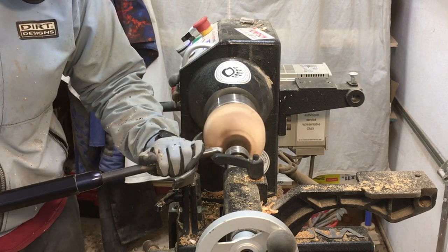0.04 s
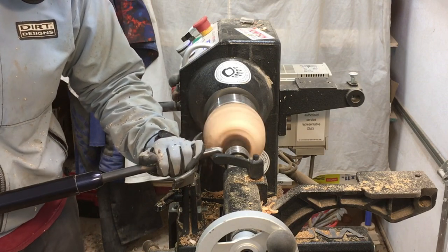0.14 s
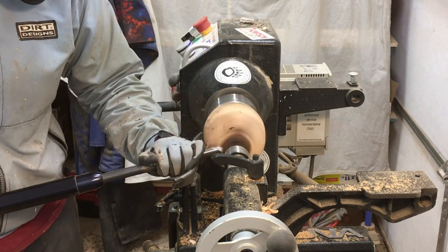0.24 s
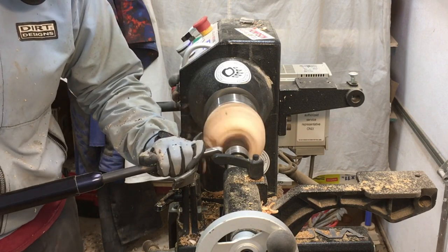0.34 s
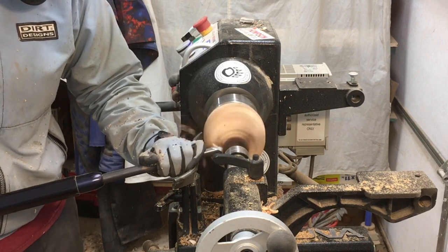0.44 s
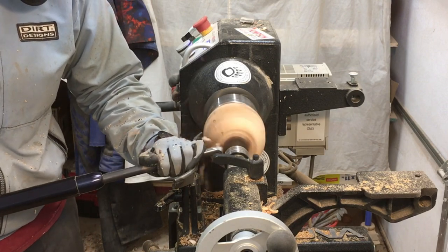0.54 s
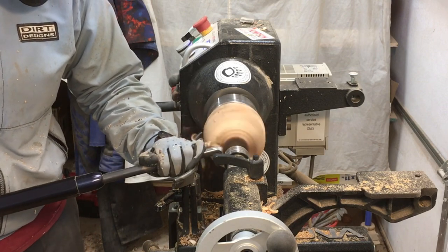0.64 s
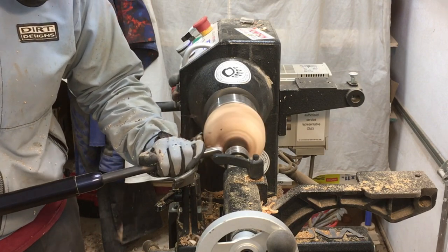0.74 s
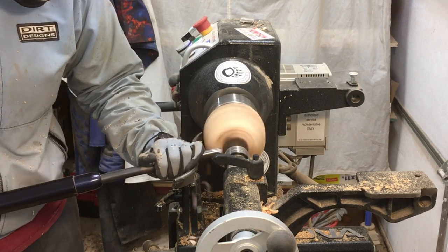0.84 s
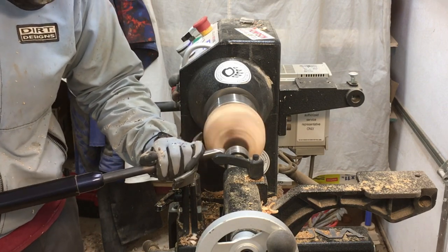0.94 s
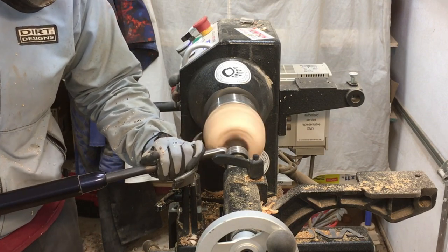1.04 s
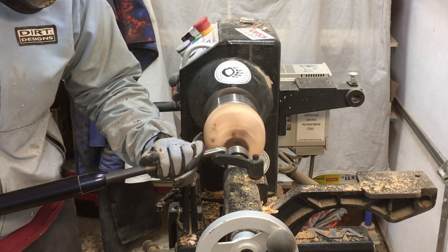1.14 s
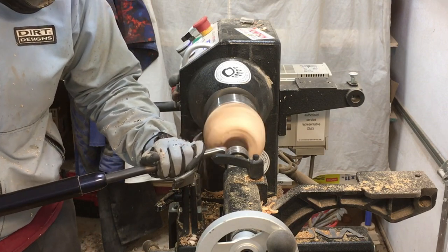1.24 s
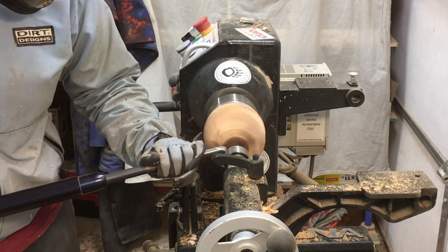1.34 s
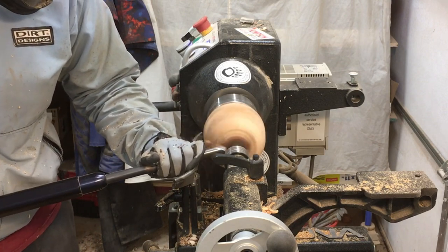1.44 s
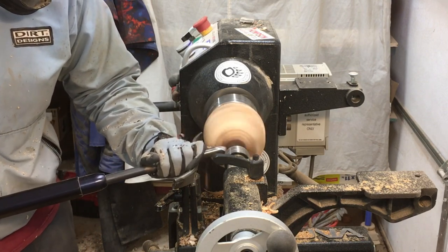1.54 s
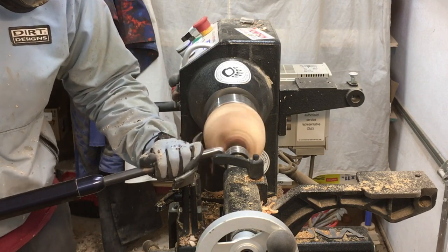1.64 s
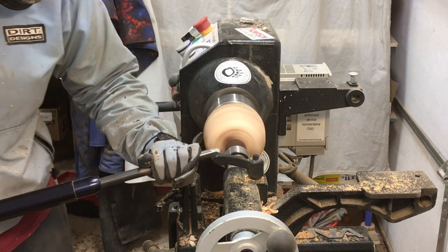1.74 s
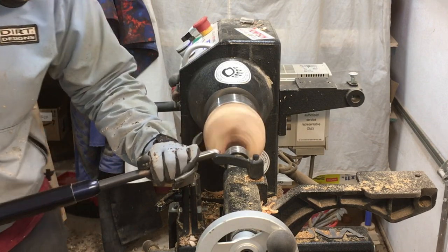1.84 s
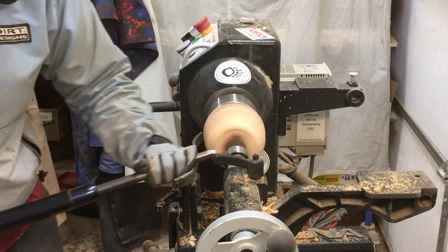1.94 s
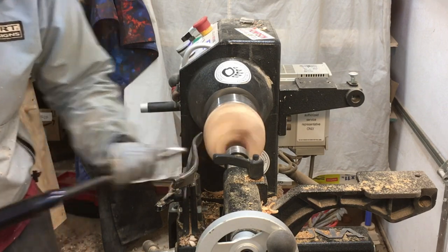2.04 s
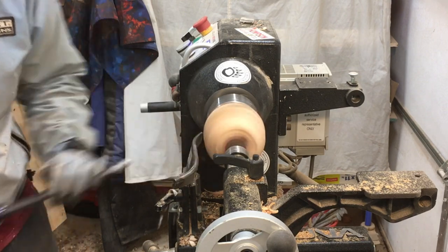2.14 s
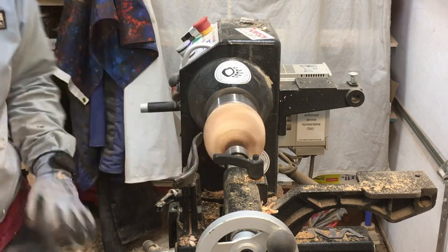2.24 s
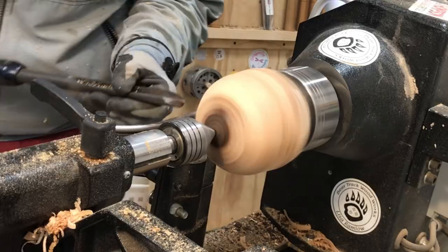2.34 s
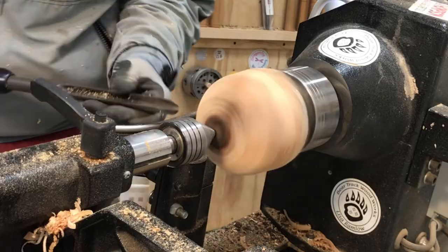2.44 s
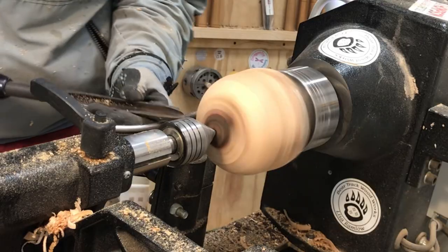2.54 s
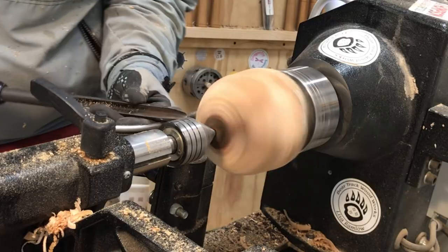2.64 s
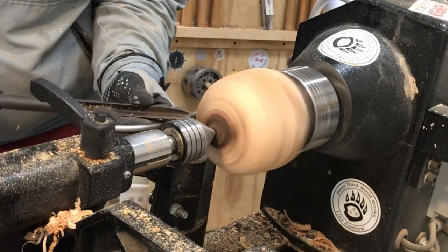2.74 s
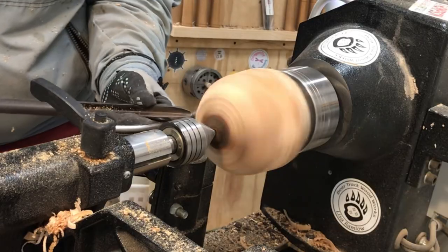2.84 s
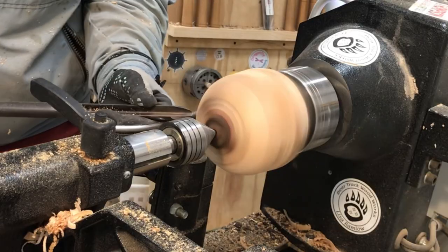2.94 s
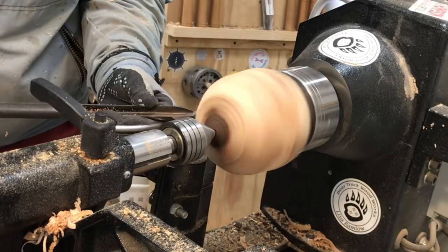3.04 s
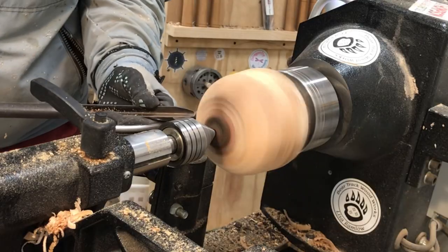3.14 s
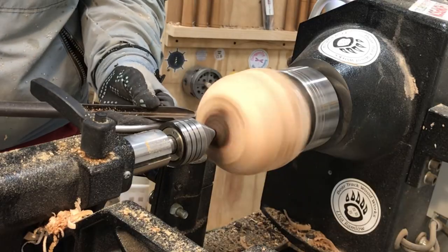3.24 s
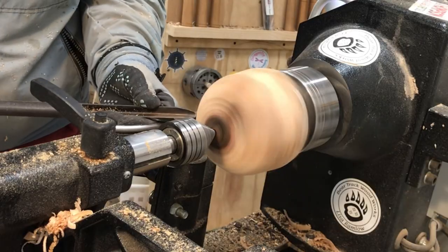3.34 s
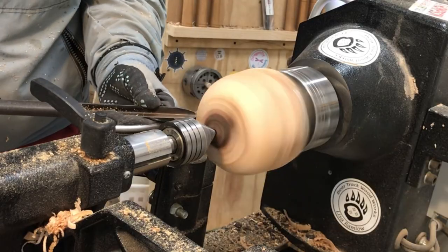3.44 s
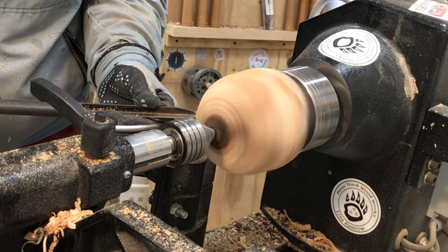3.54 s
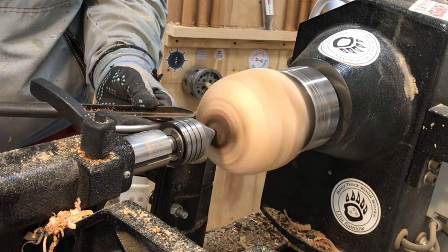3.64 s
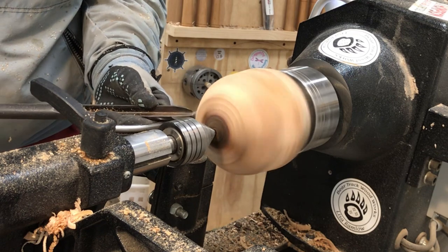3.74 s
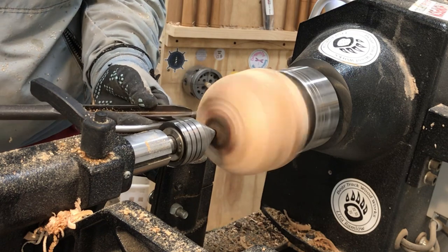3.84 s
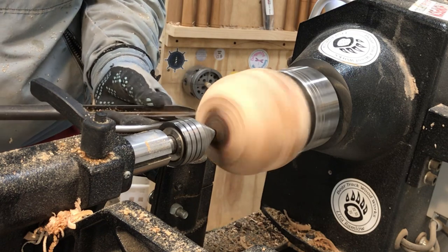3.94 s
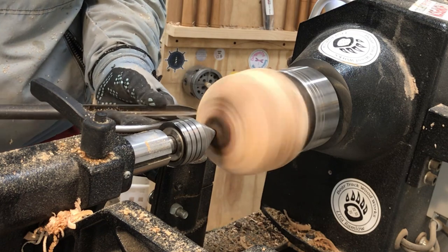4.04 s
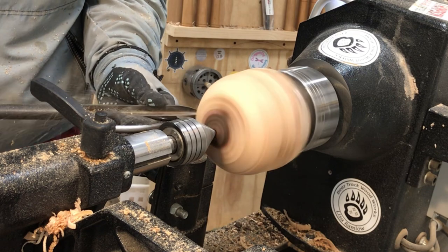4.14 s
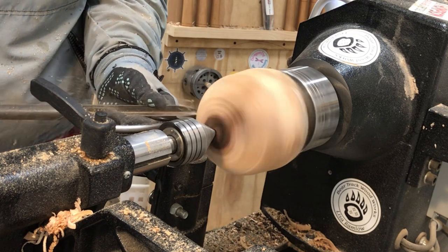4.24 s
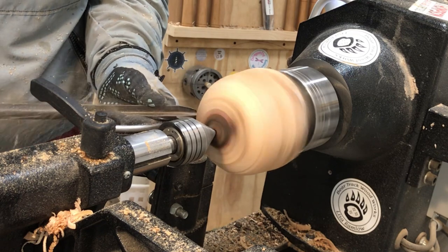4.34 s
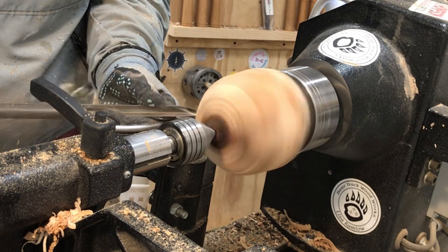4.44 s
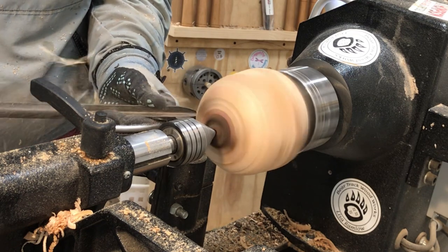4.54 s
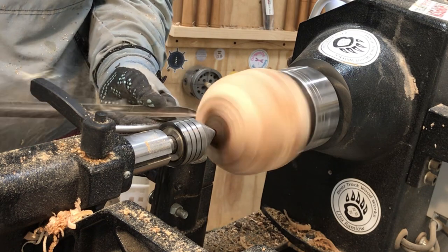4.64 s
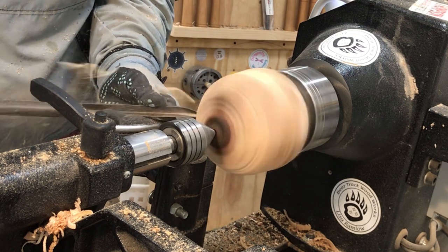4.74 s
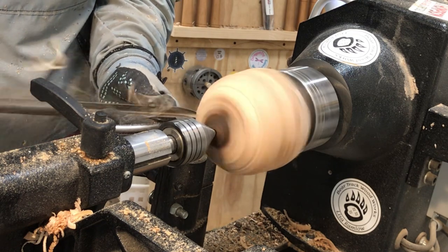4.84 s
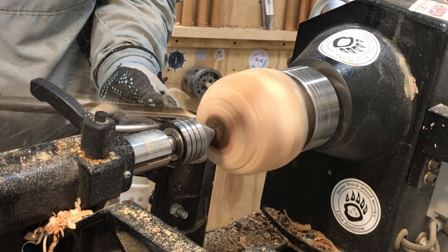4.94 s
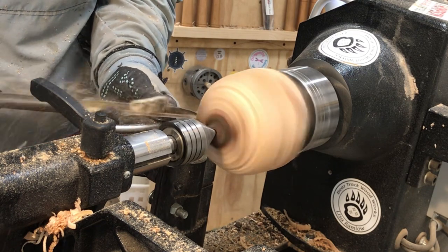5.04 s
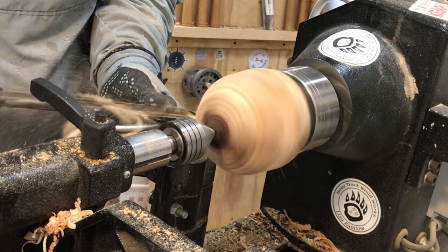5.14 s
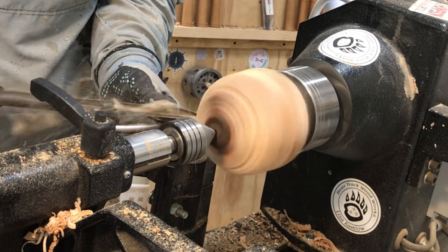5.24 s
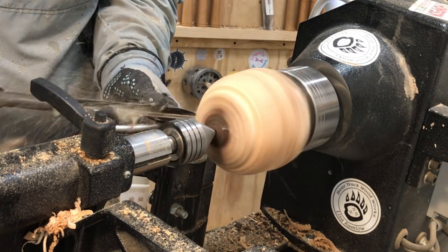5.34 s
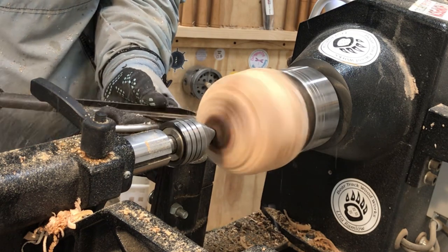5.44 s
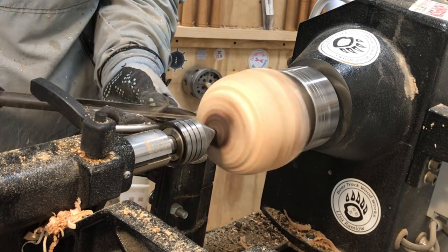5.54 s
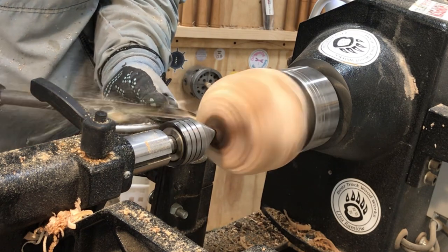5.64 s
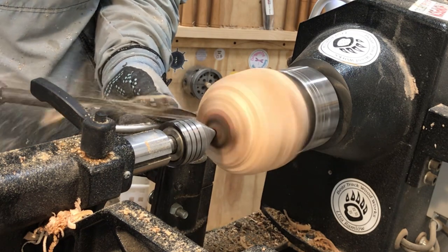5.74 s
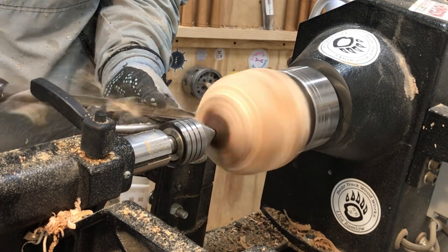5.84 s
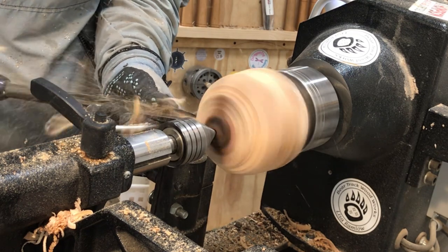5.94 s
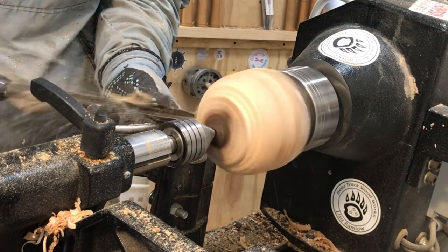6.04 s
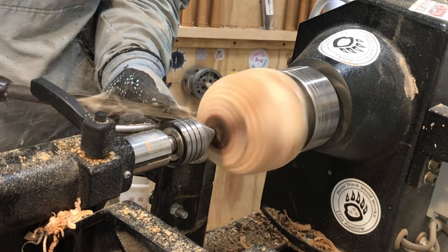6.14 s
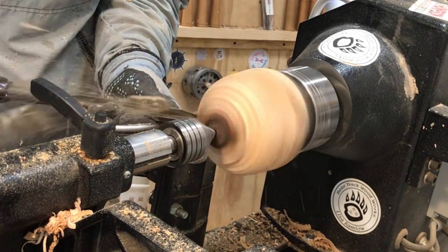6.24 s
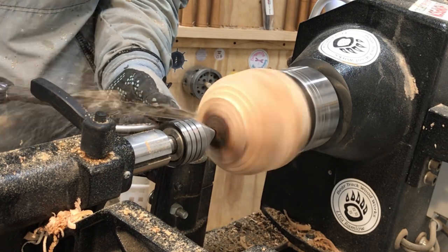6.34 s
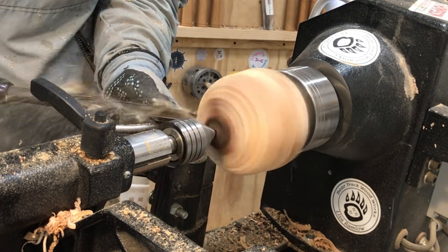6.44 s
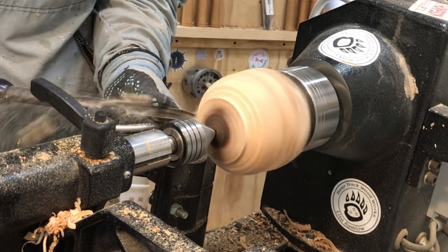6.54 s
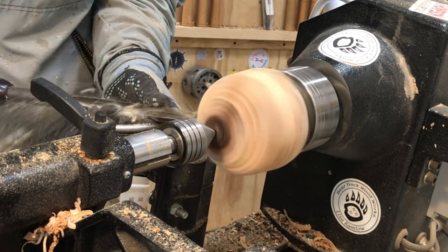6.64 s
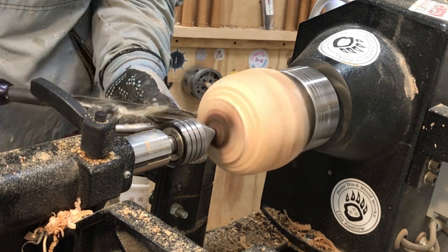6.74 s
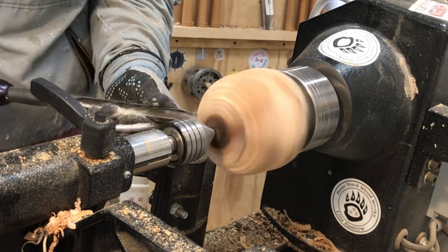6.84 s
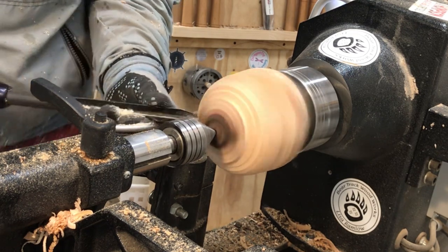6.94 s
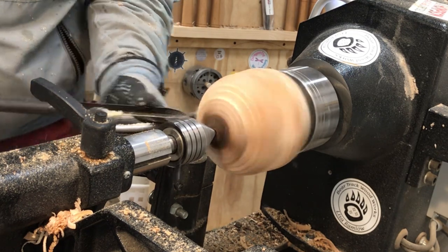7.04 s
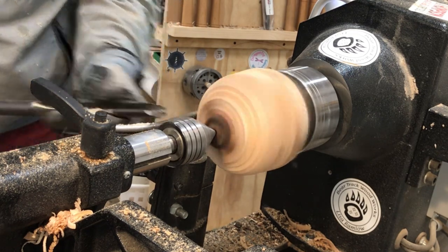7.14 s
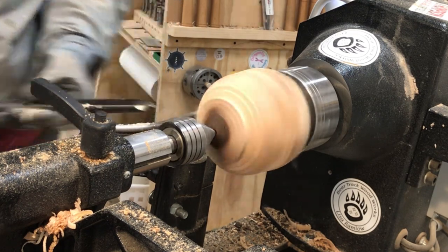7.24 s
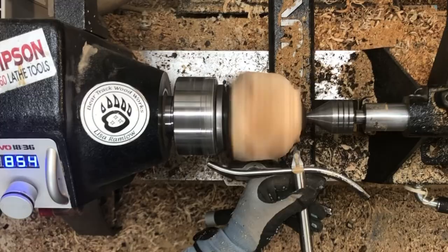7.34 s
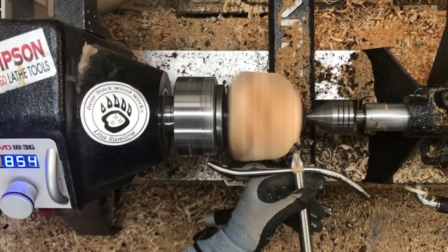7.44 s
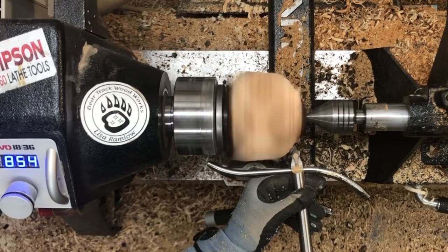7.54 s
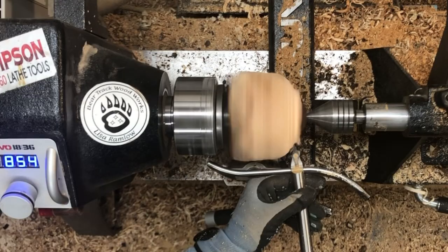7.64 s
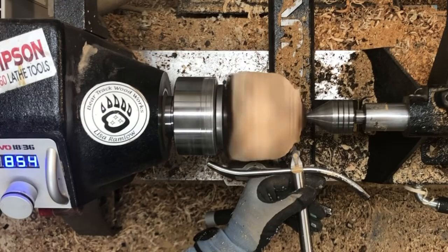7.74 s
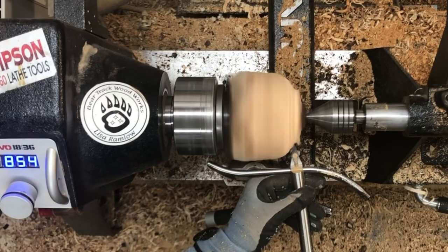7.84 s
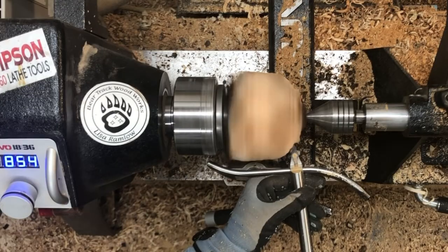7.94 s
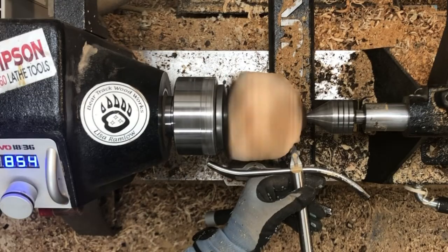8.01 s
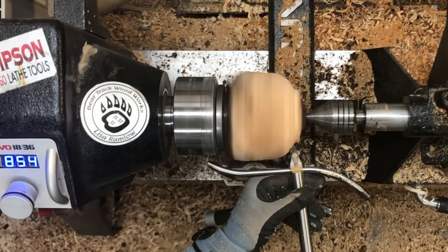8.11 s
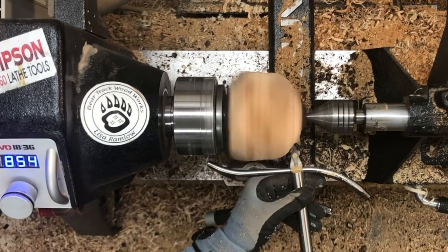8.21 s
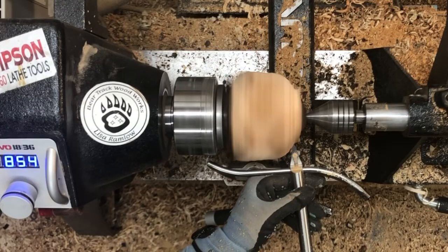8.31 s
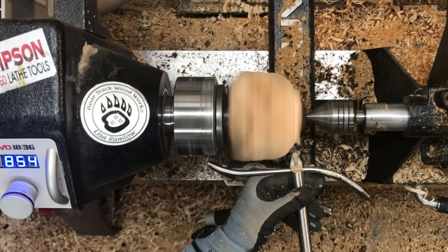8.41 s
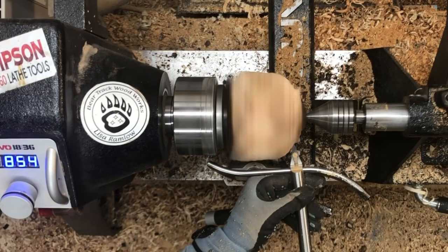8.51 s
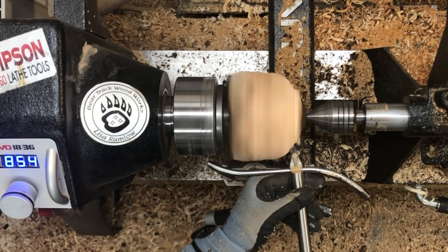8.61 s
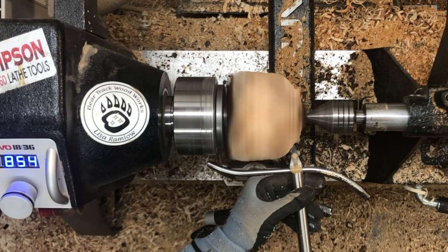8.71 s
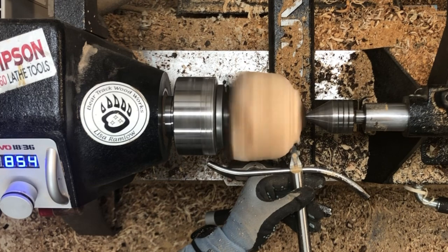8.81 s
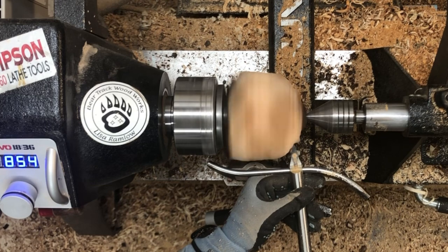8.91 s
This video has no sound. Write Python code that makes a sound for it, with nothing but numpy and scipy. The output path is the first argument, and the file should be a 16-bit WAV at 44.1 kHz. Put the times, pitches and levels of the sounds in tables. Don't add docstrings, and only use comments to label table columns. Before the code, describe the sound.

Raspy wood-turning cuts come and go over thin high motor whine, with knocks on a ringing steel rest, ending in rapid soft taps.

```python
import sys
import numpy as np
from scipy import signal
from scipy.fft import rfft, irfft, next_fast_len
from scipy.io import wavfile
from scipy.ndimage import uniform_filter1d

SR = 44100
rng = np.random.default_rng(int(sys.argv[2]) if len(sys.argv) > 2 else 0)


def file_out(sig):
    cols = np.atleast_2d(sig).T
    lim = np.clip(cols, -1, 1)
    pcm = np.round(lim * 32767).astype(np.int16)
    wavfile.write(sys.argv[1], SR, pcm)


def magnitude_from_level(level_db):
    exponent = np.asarray(level_db, float) / 20
    return 10 ** exponent


N = 395577
TURNS_PER_S = 14.3
BED, STAND = (312, 9.4), (146, 15.5)


def rms_one(x):
    return x / np.sqrt(np.mean(x ** 2) + 1e-20)


def in_time(rows, outside=None):
    s, *columns = np.transpose(rows)
    return np.array([np.interp(np.arange(N) / SR, s, c, outside, outside) for c in columns])


def strokes(spans):
    t = np.arange(N) / SR
    touching = sum((t >= rows[0][0]) & (t < rows[-1][0]) for rows in spans)
    return *in_time(sum(spans, [])), touching


def gains(spans):
    return sum(magnitude_from_level(in_time(rows, outside=-200)) for rows in spans)


def coloured(x, spectrum):
    size = next_fast_len(len(x))
    hz = np.fft.rfftfreq(size, 1 / SR) + 1
    at, db = np.transpose(spectrum)
    gain = magnitude_from_level(np.interp(np.log(hz), np.log(at), db))
    return rms_one(irfft(rfft(x, size) * gain, size)[:len(x)])


def drift(hz):
    low = signal.butter(2, hz, fs=SR, output="sos")
    return rms_one(signal.sosfilt(low, rng.standard_normal(N + SR))[SR:])


def resonate(x, modes, waver_db=0, waver_hz=15):
    out, wander = 0, magnitude_from_level(1.5 * waver_db * np.tanh(drift(waver_hz) / 1.3))
    for k, (hz, width, db) in enumerate(modes):
        r = np.exp(-np.pi * width / SR)
        top = magnitude_from_level(db) * (-1) ** k * (1 - r * r) / 2
        drive = x * np.roll(wander, k * N // 17)[:len(x)] + 1e-18
        out = out + signal.lfilter([top, 0, -top], [1, -2 * r * np.cos(2 * np.pi * hz / SR), r * r], drive)
    return out


def smoothed(x, fall_s, gain=1):
    r = np.exp(-1 / (SR * fall_s))
    return signal.lfilter([gain * (1 - r)], [1, -r], x)


def fibres(per_s, spread_db):
    sizes = magnitude_from_level(spread_db * np.minimum(rng.exponential(1, N), 5)) * rng.standard_normal(N)
    return rms_one(sizes * (rng.random(N) < per_s / SR))


def contacts(rows, shake):
    out, t = np.zeros(N + SR), np.arange(2000) / SR
    for s, db, shake_db, ms in rows:
        x = t / (ms / 2000)
        out[round(s * SR):][:len(t)] += magnitude_from_level(db + shake * shake_db) * x ** 2 * np.exp(2 - 2 * x)
    return out[:N]


# [t/s, shaving hiss/dB, push/dB, bed share of push/dB]
EARLY_CUTS = [
    [(0.0, -38, -13.5, -3.5), (0.14, -31, -12, -2), (0.3, -27.5, -7.5, -7.5), (0.5, -29.5, -12, -4),
     (0.62, -27.5, -21.5, -4), (0.76, -37, -21, -0.5), (0.86, -67, -50, -6)],
    [(0.97, -61, -39.5, 3), (1.08, -55, -14.5, -7.5), (1.16, -27.5, -8, 1.5), (1.23, -33.5, -13, 0),
     (1.31, -29, -6.5, -10), (1.39, -30.5, -8, -2), (1.5, -32.5, -7.5, -12), (1.6, -49, -33, -11),
     (1.7, -86, -45, -6)],
]
# [t/s, peak/dB, rest shake re peak/dB, length/ms]
BITES = [(0.0064, -23.5, -20, 4.4), (0.043, -22, -6, 4.4), (0.0734, -28, -19, 6.6), (0.1125, -19, 14, 4.7),
         (0.1414, -31, -12, 11), (0.2096, -29, 20, 7), (0.3494, -31, 20, 19), (0.404, -22, 8, 2.8),
         (0.4849, -32, 7, 3.7), (0.613, -33, 19, 7.1), (0.7528, -24, -17, 3.4), (0.9798, -42, -27, 8.4),
         (1.0144, -45, -7, 4), (1.046, -25.5, 12, 9.7), (1.0849, -34, -5, 3.8), (1.1179, -21.5, 23.5, 7.9),
         (1.1539, -12, 6, 6.7), (1.1877, -34, -1, 4.4), (1.254, -23.5, 1, 9.6), (1.394, -31, 25, 18),
         (1.489, -37, 7, 5.1), (3.489, -36.5, -16, 11), (3.5584, -29, -20, 3.6), (5.378, -23.5, -16, 12),
         (5.415, -35, -18, 8), (5.4482, -25, -35, 7.9), (5.4855, -29, -16, 4.1), (5.5165, -15, -30, 3.3),
         (6.9284, -34.5, -28, 9.4), (6.9984, -23.5, -37, 5)]


def gouge():
    angle, skims = spindle(), grazes()
    bites, hiss, deep_push = long_cut(angle)
    shave_db, push_db, bed_share_db, shaving = strokes(EARLY_CUTS)
    near = shaving * magnitude_from_level(shave_db + 2.0 * drift(58))
    touch = magnitude_from_level(2.5) * contacts(BITES, shake=0)
    graze = magnitude_from_level(-7.0) * contacts(skims, shake=0)
    early = np.arange(N) < 2.31 * SR
    tear = torn_fibres(bites, hiss, near, touch, early)

    whole = bites + hiss + near + touch + graze + 0.0054
    follow = whole / uniform_filter1d(whole, size=3084)
    jolts = smoothed(magnitude_from_level(-12.5) * touch * ~early + magnitude_from_level(-12.5) * graze + 1e-18, 0.032, gain=10)
    all_push = deep_push + shaving * magnitude_from_level(push_db) + jolts
    thrum, ringing, boom = shaking(all_push, bed_share_db, early)
    push = fibres(per_s=9000, spread_db=3.0)
    rest = tool_rest(ringing, follow, skims, push, angle)
    bed = bed_and_stand(thrum, boom, follow, push, angle)
    return tear + grazed_wood(graze, push) + rest, bed + thuds(skims)


# [t/s, lead/turns]
LEAD = [(4.02, -0.405), (4.6, -0.407), (5.0, -0.398), (5.38, -0.508), (5.75, -0.47), (6.4, -0.645),
        (6.64, -0.68), (7.02, -0.672)]


def spindle():
    return TURNS_PER_S * np.arange(N) / SR + in_time(LEAD)[0]


# [t/s, hiss/dB, end-grain bite/dB, first bite re second/dB]
DEEP_CUTS = [
    [(4.0, -38.5, -29.5, -1), (4.14, -36, -22, -5.5), (4.6, -32, -19, 4.5), (5.0, -22.5, -14.5, -2.5),
     (5.27, -23, -15.5, -1.5), (5.365, -30.5, -22.5, -14)],
    [(5.535, -31, -22.5, -2), (5.77, -22.5, -12.5, -1.5), (6.08, -18, -14, 21), (6.35, -21, -15, -7),
     (6.58, -31.5, -19, -12.5), (6.74, -31.5, -20, -15.5), (6.89, -37, -32, -30), (6.915, -44, -30, -33.5),
     (7.05, -49, -75, -13)],
]
# [t/s, crest/dB, bite re usual/dB]
CRESTS_A = [(4.0119, -38, 8), (4.049, -26.0, -8), (4.0836, -27, 0.7), (4.119, -23.5, -7), (4.1537, -24, -2),
            (4.1879, -29, -4), (4.2229, -25, 0), (4.2568, -26, 1.5), (4.2927, -30, 1), (4.3254, -20, -3),
            (4.365, -21.0, -4), (4.396, -24, -2), (4.4325, -22, -1), (4.4636, -14, -3.5),
            (4.5018, -27.0, -2), (4.5353, -25, 4), (4.5731, -23, -3), (4.6047, -17, -4), (4.6435, -28, -2),
            (4.6748, -22.5, 0.5), (4.7131, -14, -6), (4.745, -20, 3.5), (4.784, -18, -4),
            (4.8157, -15, -0.4), (4.853, -15.5, 1.5), (4.888, -17, -6), (4.9267, -18, 1.5), (4.956, -9, -1),
            (4.9955, -18.0, 4), (5.0275, -17, -1), (5.066, -15, 5), (5.0993, -18.0, 4), (5.1386, -11, -1),
            (5.1697, -18.0, 4), (5.2098, -10, 3.5), (5.241, -25, 4), (5.2817, -15, 2.5), (5.313, -14, 0.1),
            (5.3487, -31, -2)]
CRESTS_B = [(5.558, -26, 1), (5.5917, -25, 7), (5.6273, -25, 1), (5.6605, -26.0, 2.5), (5.6994, -17, -5),
            (5.7251, -20, 1), (5.769, -14, -6), (5.801, -29.0, 2), (5.8415, -17, -4), (5.8671, -23.0, 7.5),
            (5.9108, -14, -9), (5.9434, -25, 11), (5.9781, -5.5, -9), (6.0097, -9, 1), (6.0486, -22, -2.5),
            (6.081, -10, -9), (6.12, -19, -1.5), (6.162, -9, 4), (6.1973, -15.0, -1), (6.232, -9.5, 0),
            (6.2683, -15, 1), (6.3034, -28, 1.5), (6.3377, -13, -4), (6.3735, -12, -2), (6.4104, -23, -7),
            (6.4434, -14, -0.5), (6.4798, -24.0, 2.1), (6.514, -15, -1), (6.5491, -20, 1.7),
            (6.5814, -16, -0.9), (6.6192, -27, 0), (6.654, -17, -1), (6.6885, -25.5, -11),
            (6.723, -19, -0.3), (6.7596, -35, 2), (6.793, -28, 2), (6.829, -32.0, 8), (6.8633, -18, 2.2),
            (6.8938, -45, 6)]


def long_cut(angle):
    hiss_db, bite_db, lopsided_db, touching = strokes(DEEP_CUTS)
    bites = 0
    for db, at_turns in ((bite_db + lopsided_db / 2, 0), (bite_db - lopsided_db / 2, 0.488)):
        width = np.clip(.225 + 0.0065 * bite_db, .065, .16)
        off = (angle - at_turns + .5) % 1 - .5
        sharp = np.maximum(0.45 * width, 2 * width - .13)
        width = np.where((off < 0) & (at_turns > 0), sharp, width)
        bites = bites + magnitude_from_level(db + .4 * drift(25)) * np.exp(-(off / width) ** 2)
    s, crest_db, over_db = np.transpose(CRESTS_A + CRESTS_B)
    crest_lead_s, crest_ms = .001, 5
    crests = contacts(zip(s - crest_lead_s, crest_db + 3.5, 0 * s, crest_ms + 0 * s), shake=0)
    bites = np.hypot(bites * magnitude_from_level(-2 + in_time(list(zip(s, over_db)))[0]), crests)
    push = magnitude_from_level(bite_db + 0.32 * np.abs(lopsided_db))
    return bites * touching, magnitude_from_level(hiss_db) * touching, push * touching


# [f/Hz, width/Hz, level/dB]
GOUGE = [(4700, 140, -1), (4900, 300, 0), (5290, 140, -5), (7150, 150, -4), (7680, 90, -6), (8470, 80, -1),
         (9140, 150, -3), (11100, 300, -7)]
# [f/Hz, width/Hz, level/dB]
CHATTER = [(4240, 105, 0)]
# [f/Hz, level/dB per Hz]
TEAR_NEAR = [(1530, -2.5), (2600, 1.5), (3110, -6), (3360, -7), (3860, -8), (4570, 0), (6180, -5.5),
             (7100, -5.5), (15200, -8.5), (16100, -17), (16500, -55)]
TEAR_FAR = [(1710, -14.5), (3000, -13), (4760, -7), (5920, -10.5), (9220, -13.5), (12000, -7.5),
            (15700, -19.5), (16200, -47)]
BITE_FAR = [(1710, -1), (3000, 0), (4300, 4), (5900, 5), (7000, 13), (15500, 14), (16100, -28),
            (16500, -87)]
COARSE = [(700, -27), (1600, 0.5), (3400, 6), (5000, -0.5), (8000, -28)]


def torn_fibres(bites, hiss, near, touch, early):
    snaps = fibres(per_s=24000, spread_db=1.6)
    chips = patchy(snaps, patch_db=3.0)
    flute = resonate(snaps, GOUGE, waver_db=4.5, waver_hz=22)
    lumps = fibres(per_s=900, spread_db=4.5)
    steel = coloured(chips + magnitude_from_level(1.5) * flute, TEAR_FAR)
    end_grain = coloured(chips + magnitude_from_level(3) * flute, BITE_FAR)
    early_tear = (near + touch) * coloured(snaps + 0.84 * chips + 0.7 * lumps, TEAR_NEAR)
    tear = np.where(early, early_tear, hiss * steel + (bites + touch) * end_grain)
    tear = tear + magnitude_from_level(16) * resonate(bites ** 2 * snaps, CHATTER, waver_db=6.5)
    return tear + magnitude_from_level(-12.5) * (hiss + near + .4 * bites) * coloured(np.roll(lumps, SR), COARSE)


def patchy(x, patch_db):
    out, below, wander = 0, 0, magnitude_from_level(patch_db * drift(40.0))
    for k, hz in enumerate(np.geomspace(2500, 20000, 8)):
        low = signal.filtfilt(*signal.butter(2, hz, fs=SR), x)
        out = out + np.roll(wander, k * N // 17) * (low - below)
        below = low
    return rms_one(out)


def grazes():
    from_s, every_s, count = 7.9349, .06933, 15
    k = np.arange(-1, count)
    db = -25.5 - np.where(k < 0, 2, 0.46 * k) + 1.0 * rng.standard_normal(len(k))
    shake_db, length_ms = -17 - .8 * k, 6.1 + 0 * k
    return list(zip(from_s + every_s * k, db, shake_db, length_ms))


# [f/Hz, width/Hz, level/dB]
BLANK = [(1050, 640, -1), (2470, 260, 4), (3750, 500, 3)]
# [f/Hz, level/dB per Hz]
GRAZE_TEAR = [(300, -20), (1500, -13), (4850, -0.5), (6050, 1.5), (14500, -2.5), (16000, -12), (16500, -31)]


def grazed_wood(graze, push):
    wood = magnitude_from_level(-26) * smoothed(graze + 1e-18, 0.0076, gain=10) * rms_one(resonate(push, BLANK))
    snaps = fibres(per_s=24000, spread_db=1.6)
    return wood + graze * coloured(snaps, GRAZE_TEAR)


def shaking(push, bed_share_db, early):
    over_db = 20 * np.log10(push + 1e-6) + 13
    parts = ((-33, 0.93, bed_share_db * early),
             (-29, 0.95, 0),
             (-39, 0.67, (1.6 * bed_share_db + 2) * early))
    return [magnitude_from_level(db + slope * over_db + more + 1.0 * drift(3.8)) for db, slope, more in parts]


# [f/Hz, width/Hz, level/dB]
REST = [(527, 49, -2.5), (605, 5, 3.5), (430, 10, -3), (841, 85, -2.5), (959, 18, -5), (1044, 45, -0.5),
        (1138, 15.5, -1.5), (1468, 29, -5), (1625, 25.5, -0.5), (1852, 44, -2.5), (2206, 11, -2),
        (2427, 58, -1), (213, 15, -12), (3255, 61, -12)]
# [f/Hz, level/dB per Hz]
SHAKE = [(40, -83), (112, -40), (143, -3), (240, -15.5), (290, -5), (450, -13), (1640, -16.5), (2410, -25),
         (3300, -39), (7260, -110)]


def tool_rest(ringing, follow, skims, push, angle):
    lagged = np.roll(follow, round(.005 * SR))
    force = magnitude_from_level(4.0) * ringing * lagged ** 0.66 + magnitude_from_level(-8.0) * contacts(BITES + skims, shake=0.75)
    usual = np.std(resonate(push[:SR], REST))
    ring = magnitude_from_level(-4.5) * resonate(force * push, REST, waver_db=3.5, waver_hz=24) / usual
    grain = rms_one(push[(angle % 1 * SR / TURNS_PER_S).astype(int)] + .5 * push)
    return ring + magnitude_from_level(-7.0) * force * coloured(grain, SHAKE)


# [t/s, steady bed/dB, rocking bed/dB, stand kick/dB, kick lag/turns]
LOCKED = [
    [(4.0, -63, -53, -48, 0.38), (4.15, -37, -43, -62, 0.23), (4.45, -55, -40, -46, 0.44),
     (4.7, -49, -44, -60, 0.27), (4.9, -38, -24.5, -55, 0.62), (5.05, -40, -29.5, -34, 0.58),
     (5.2, -24.5, -27, -29, 0.43), (5.32, -29, -27, -34, 0.42), (5.41, -44, -37, -42, 0.46)],
    [(5.52, -54, -32, -61, 0.41), (5.6, -48, -30, -38, 0.33), (5.8, -74, -23.5, -35, 0.55),
     (6.0, -45, -27, -33, 0.67), (6.2, -32.5, -25, -30, .6), (6.4, -31.5, -28, -33.5, 0.59),
     (6.6, -24.5, -50, -38.5, 0.6), (6.85, -29.5, -39, -44, .62), (7.03, -45, -45, -80, 0.53)],
]


def bed_and_stand(thrum, boom, follow, push, angle):
    wobble_db = 5.5 * np.cos(2 * np.pi * (angle - .38))
    loose_db = -9 * strokes(LOCKED)[-1]
    bed = heavy_mode(magnitude_from_level(7.5 + wobble_db + loose_db) * thrum * follow ** 0.17, push, *BED)
    stand = heavy_mode(magnitude_from_level(3.5 + wobble_db + loose_db) * boom * follow ** 0.096, push, *STAND)
    return locked(angle) + bed + stand


def heavy_mode(force, push, hz, width):
    mode = signal.hilbert(rms_one(resonate(push, [(hz, width, 0)])), next_fast_len(N))[:N]
    even = rms_one(mode.real / (np.abs(mode) + .1) ** .8)
    return resonate(even * smoothed(force, 0.0071), [(hz, 60, 0)])


# [cycles/turn, level/dB]
STAND_ORDERS = [(9, -9), (10, 1), (11, -1), (12, -10)]


def locked(angle):
    steady_db, rock_db, kick_db, lag, touching = strokes(LOCKED)
    turn, sway = 2 * np.pi * angle, .6 * drift(7)
    bed_phase = 22 * turn + sway
    rocking = np.cos(turn - 2 * np.pi * 0.23)
    bed = magnitude_from_level(steady_db) * np.cos(bed_phase) + 2 ** .5 * magnitude_from_level(rock_db) * rocking * np.sin(bed_phase)
    slip = .6 * drift(3)
    stand = sum(magnitude_from_level(db) * np.cos(order * (turn - 2 * np.pi * lag) + slip) for order, db in STAND_ORDERS)
    return uniform_filter1d(1. * touching, size=600) * (2 ** .5 * bed + magnitude_from_level(kick_db) * stand)


# [f/Hz, width/Hz, level/dB]
THUD = [(302, 11, 0), (650, 60, -15), (334, 14, -5), (1100, 70, -15)]
# [t/s, level/dB]
FIRST_THUDS = [
    (3.495, 11),
    (3.563, 0),
]


def thuds(skims):
    taps = np.zeros(N)
    graze_thuds = [(s + .004, 13 - .8 * k) for k, (s, *_) in enumerate(skims[1:])]
    for s, db in FIRST_THUDS + graze_thuds:
        taps[round(s * SR)] = magnitude_from_level(db)
    return resonate(signal.lfilter([.2], [1, -.8], taps + 1e-18), THUD)


# [t/s, peak/dB, centre f/Hz, t60/s]
KNOCKS = [(0.113, -3, 490, 0.28), (1.051, -12, 585, 0.41), (1.12, -10, 920, 0.12), (1.154, -27, 990, 0.14),
          (1.49, -3, 2150, 0.13), (1.324, -2, 1010, 0.27), (0.418, -4.5, 2800, 0.36),
          (1.765, -27, 5000, 0.033), (1.799, -45, 678, 0.067), (1.89, -28, 778, 0.075),
          (1.999, -21, 2000, 0.076), (5, 10, 1030, 0.041), (5.854, 4, 960, 0.069),
          (7.088, -21, 3220, 0.083), (7.099, -27, 1100, 0.12)]
# [t/s, peak/dB, t60/s]
SET_DOWN = [
    (2.599, -10.5, 0.059),
]
# [f/Hz, width/Hz, level/dB]
BENCH = [(705, 9.1, 3.5), (1070, 7.9, -3), (1183, 6, 0), (1584, 10, 3.5), (1460, 14, -1.5), (2420, 50, 2),
         (2560, 26, -4), (3240, 49, -1.5), (3480, 14, -11), (4200, 12, -8), (4646, 20, -4), (5500, 25, -6),
         (6810, 37, -6), (7100, 25, -11)]
# [f/Hz, level/dB per Hz]
SET_DOWN_CLACK = [(180, -25), (300, -12), (857, -11.5), (1150, -7), (1850, -11), (2450, -7), (3950, -10),
                  (4750, -2), (5130, -12), (10100, -27), (12000, -32), (15600, -64), (22000, -120)]


def knocks():
    white, out, t = rng.standard_normal(N + SR), np.zeros(N + SR), np.arange(SR // 2) / SR
    for s, db, hz, t60 in KNOCKS:
        at = round(s * SR)
        tap = resonate(magnitude_from_level(db - 60 * t / t60) * white[at:at + len(t)], [(hz, 0.5 * hz, 0)])
        out[at:at + len(t)] += magnitude_from_level(6.0) * resonate(tap, REST) + 0.44 * tap
    clack = coloured(white[:len(t)], SET_DOWN_CLACK)
    bounce_s, bounce_db = .011, -14
    for s, db, t60 in SET_DOWN:
        bounce = np.arange(len(t)) == round(bounce_s * SR)
        blows = magnitude_from_level(db + 29) * ((t == 0) + magnitude_from_level(bounce_db) * bounce)
        fall = magnitude_from_level(db - 17 - 60 * t / t60) + magnitude_from_level(db - 29.0 - 10 * t / t60)
        out[round(s * SR):][:len(t)] += resonate(blows, BENCH) + fall * clack
    return out[:N]


# [t/s, level/dB]
RUSTLE = [
    [(1.65, -59), (1.764, -57), (2.146, -53), (2.31, -51)],
    [(7.05, -58), (7.136, -46.5), (7.27, -49), (7.34, -61)],
]


def sleeve():
    spectrum = [(500, 2.0), (1500, -1.5), (4000, 4.0), (8000, -5), (15000, -17.0)]
    return gains(RUSTLE)[0] * coloured(fibres(per_s=6900, spread_db=-2.0), spectrum)


# [from t/s, whine/dB, rumble/dB, hum/dB, floor-borne drone/dB]
PLACES = [
    (0, 3.5, -49, 6.5, -49),
    (2.308, 2, -50.5, 4.5, -54),
    (7.34, 1.5, -50.5, 4, -48),
]
# [f/Hz, level/dB]
HUM = [(59.2, -90), (156.1, -73), (312.2, -71.5), (780.6, -73), (1028, -75), (1410, -86), (1480, -77),
       (1814, -80)]
# [f/Hz, level/dB per Hz]
IDLE = [(35, -45), (60, 3), (92, 2), (125, 5.5), (190, -3), (691, 1), (1030, 3.5), (1300, -4), (2140, -3),
        (2640, -10.5), (3110, -10.5), (3500, -12.5), (7960, -12.5), (10100, -9.5), (11500, -8.5),
        (13000, -20), (15400, -11), (16500, -35)]


def motor():
    which = np.searchsorted(np.array(PLACES)[:, 0] * SR, np.arange(N), "right") - 1
    whine_db, rumble_db, hum_db, drone_db = np.array(PLACES)[which, 1:].T
    white = rng.standard_normal(N)
    haze = magnitude_from_level(-71) * rms_one(resonate(resonate(white, [(10000, 350, 0)]), [(10350, 300, 0)]))
    beside, above = side_lines()
    rise_s = PLACES[-1][0]
    whine = tones(beside, 1.0, to_s=rise_s) + tones(above, 1.0, scatter=0.35, from_s=rise_s) + haze
    frame = resonate(white, REST + [(*BED, 0), (*STAND, 0), (3120, 160, 3)])
    rumble = coloured(white + magnitude_from_level(1) * frame, IDLE)
    drone = rms_one(resonate(resonate(white, [(57.4, 5.9, 0)]), [(57.4, 5.9, 0)]))
    hum = tones(HUM, waver_db=4.5)
    return magnitude_from_level(whine_db) * whine + magnitude_from_level(rumble_db) * rumble + magnitude_from_level(hum_db) * hum + magnitude_from_level(drone_db) * drone


# [steps from carrier, beside/dB, above/dB]
SIDE_LINES = [(-11, -71, -71), (-6, -54, -55), (-2, -60, -57), (0, -69, -90), (2, -64, -65), (6, -59, -56),
              (22, -67, -71), (30, -68, -64)]


def side_lines():
    carrier_hz, step_hz = 10000, 17.25
    strong = np.array(SIDE_LINES)
    steps = np.setdiff1d(np.arange(-42, 43, 4), strong[:, 0])
    faint_db = -71 + .05 * steps + 1.5 * rng.standard_normal((2, len(steps)))
    hz = carrier_hz + step_hz * np.r_[strong[:, 0], steps]
    return [list(zip(hz, db)) for db in np.c_[strong[:, 1:].T, faint_db]]


def tones(lines, waver_db, scatter=1, from_s=0, to_s=9):
    out, span = np.zeros(N), slice(int(from_s * SR), int(to_s * SR))
    t = (np.arange(N) / SR)[span]
    swell = [magnitude_from_level(waver_db * drift(4))[span] for _ in range(4)]
    for k, (hz, db) in enumerate(lines):
        phase = 2 * np.pi * (hz * t + scatter * rng.random())
        out[span] += magnitude_from_level(db + 4.5) * swell[k % 4] * np.sin(phase)
    return out


def workshop(x):
    t, t60_s = np.arange(SR // 2) / SR, 0.35
    low = signal.butter(1, 3000, fs=SR)
    dull = signal.lfilter(*low, rng.standard_normal(len(t))) * magnitude_from_level(-60 * t / t60_s)
    bright = 2.57 * rng.standard_normal(len(t)) * magnitude_from_level(-60 * t / (0.1 * t60_s))
    tail = (dull + bright) * (t > .004)
    return magnitude_from_level(-8) * signal.fftconvolve(x, tail / np.sqrt(np.sum(tail ** 2)))[:N]


def scene_change_dips():
    t = np.arange(N) / SR
    return 1 - sum(0.78 * np.exp(-((t - s) / 0.0037) ** 2) for s, *_ in PLACES[1:])


def scene():
    cut, bed = gouge()
    work = cut + knocks()
    low_edge = signal.butter(6, 106, "high", fs=SR, output="sos")
    work = signal.sosfilt(low_edge, work + workshop(work) + bed)
    return ((work + sleeve() + motor()) * scene_change_dips())[None]


def roll_off(x):
    return signal.sosfilt(signal.butter(12, 17000, fs=SR, output="sos"), x)


def record(dry):
    x = signal.sosfilt(signal.butter(4, 95., "high", fs=SR, output="sos"), dry)
    x = 0.69 * np.tanh(x / 1.01)
    x = signal.sosfilt(signal.cheby2(14, 50, 16600, fs=SR, output="sos"), x)
    return roll_off(x)


dry = scene()
out = record(dry)
file_out(out)
```